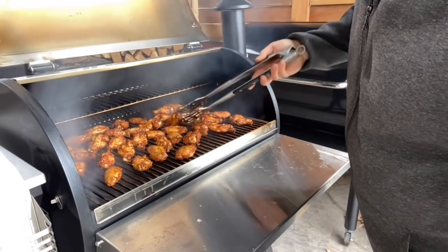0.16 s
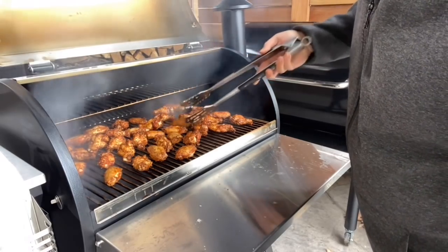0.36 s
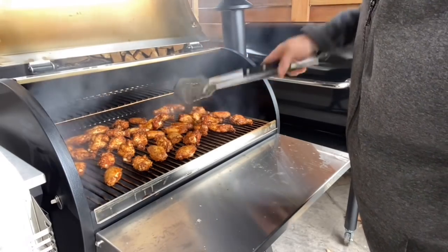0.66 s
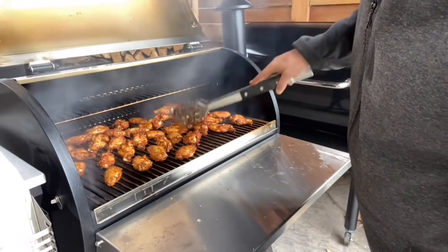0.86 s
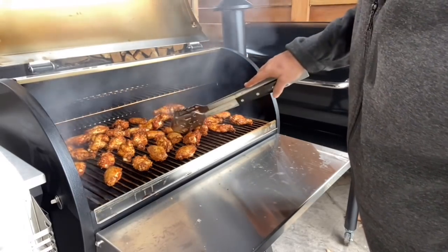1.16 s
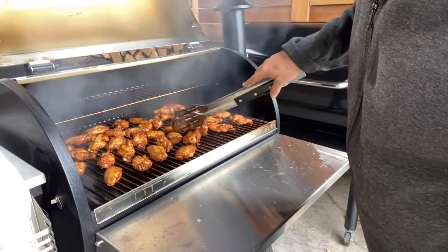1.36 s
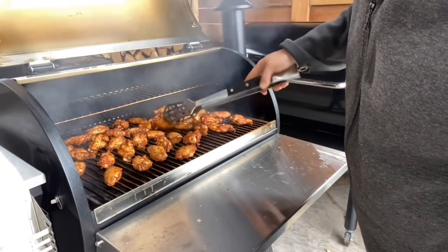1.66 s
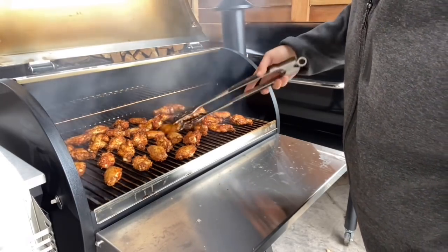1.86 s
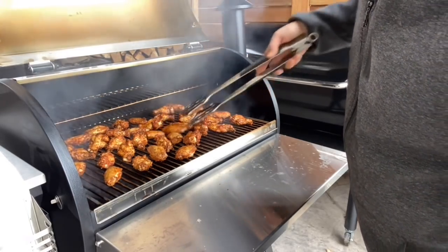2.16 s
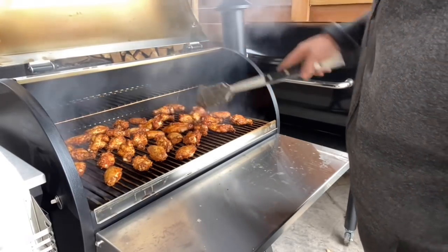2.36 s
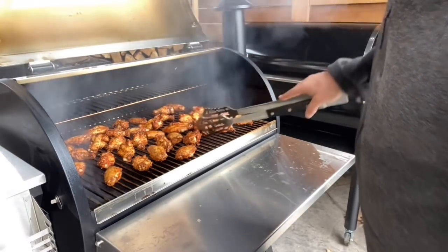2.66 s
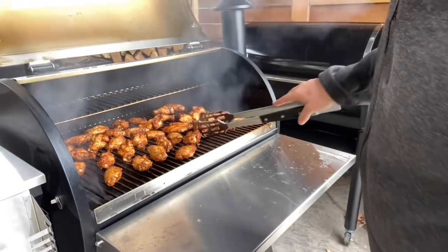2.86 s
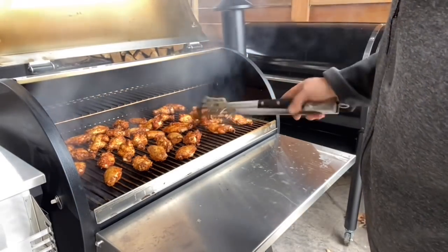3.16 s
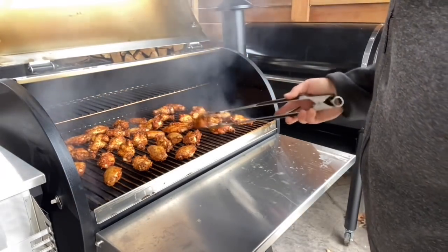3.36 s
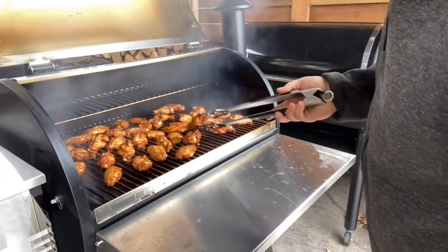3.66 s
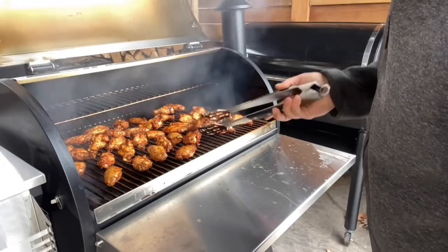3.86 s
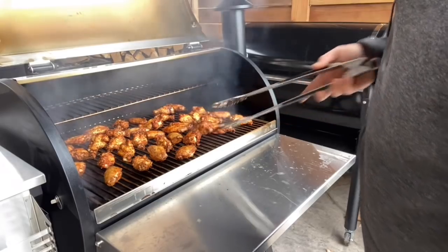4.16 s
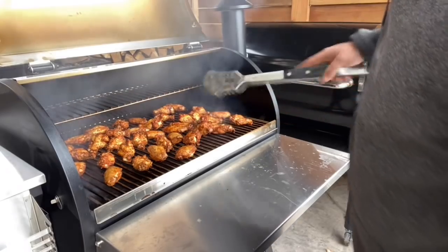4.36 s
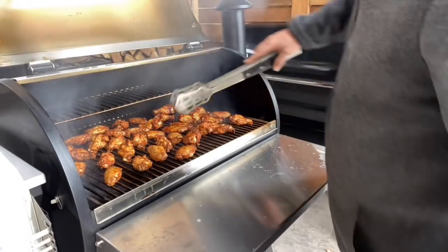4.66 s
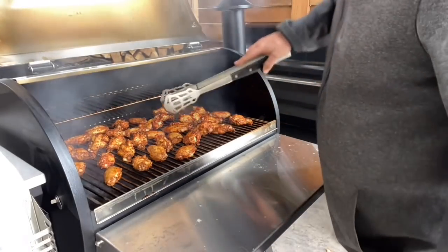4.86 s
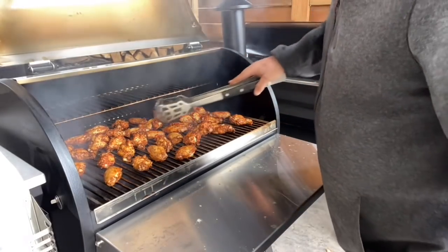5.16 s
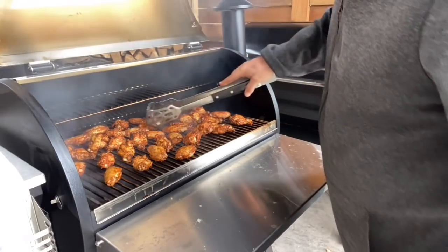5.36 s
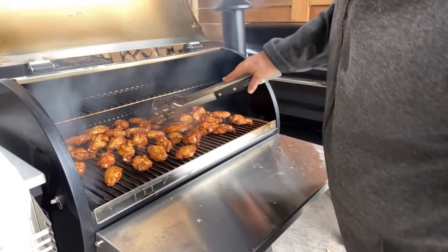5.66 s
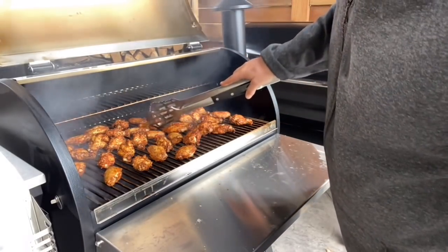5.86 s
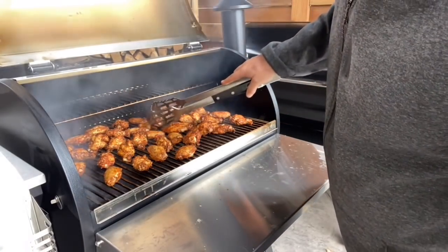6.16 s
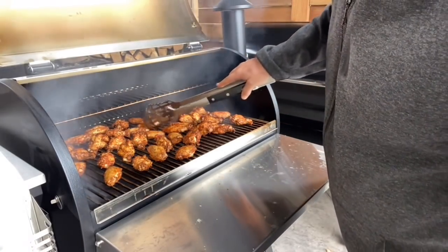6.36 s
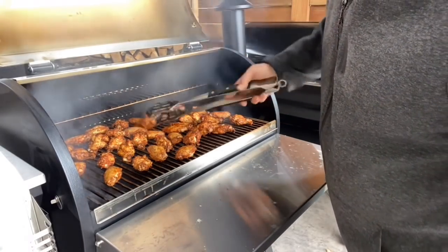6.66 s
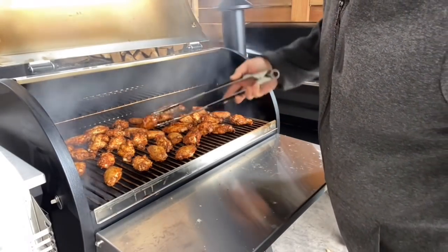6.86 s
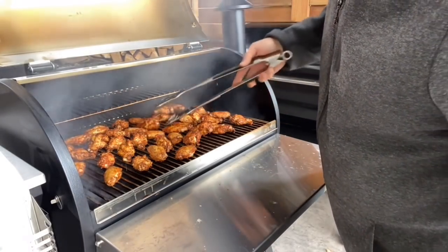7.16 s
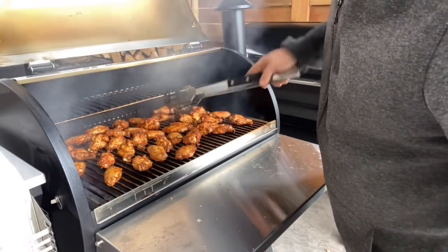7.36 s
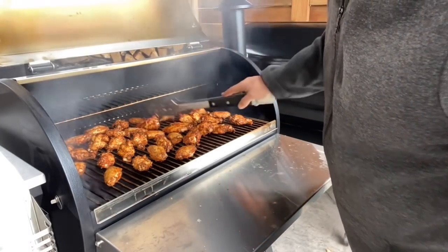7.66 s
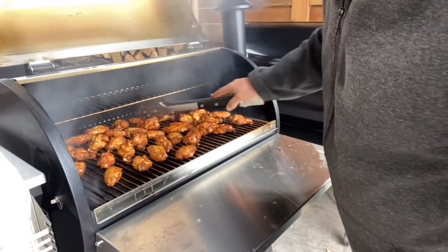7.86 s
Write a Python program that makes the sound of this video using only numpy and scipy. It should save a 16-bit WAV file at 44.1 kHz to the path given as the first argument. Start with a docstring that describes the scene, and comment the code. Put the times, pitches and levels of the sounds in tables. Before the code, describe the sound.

Quiet fluttering sizzle and hollow barrel hum, broken by bursts of tong scraping, crisp clicks, soft bar notes and late rattling grate knocks.

```python
"""Chicken wings sizzle on an open barrel grill outdoors; draught noise hums in the barrel's resonances.
From 1.2 s soft bar notes, then tongs drag skin off the bars: dense ringing slips and click-spray snaps to 3.8 s.
From 4.1 s a low barrel note swells and throbs, with a dull thud; soft notes crowd in, drags return at 5.4 s.
At 6.5 s, and hardest at 7.4-7.7 s, knocks rattle the bars, which ring the modes of the grate.
Near sounds lose their bass, a faint rumble follows them, and the microphone cuts the treble."""
import sys
import numpy as np
from scipy import signal
from scipy.fft import rfft, irfft, next_fast_len
from scipy.io import wavfile
from scipy.ndimage import uniform_filter1d

SR = 44100
rng = np.random.default_rng(int(sys.argv[2]) if len(sys.argv) > 2 else 0)


def dump_mix(stems):
    """Bounce the given channels to the path in sys.argv[1] as a 16-bit WAV at rate SR."""
    frames = np.atleast_2d(stems).T  # one column per channel
    limited = np.clip(frames, -1, 1)  # hard clip at full scale
    pcm = np.round(limited * 32767).astype(np.int16)
    wavfile.write(sys.argv[1], SR, pcm)


N = 353505

# pulls of the tongs: [peak_s, build_s, fade_s, rasp_db, scrape_db, hiss_db]
DRAG_PULLS = [(1.4, 0.17, 0.34, -67.5, -62.5, -58.5), (1.6, 0.033, 0.14, -73, -66, -54.5),
              (1.783, 0.04, 0.04, -55, -49, -55), (1.829, 0.0077, 0.18, -54, -51.5, -47.5),
              (1.91, 0.008, 0.1, -49, -49, -50), (1.94, 0.042, 0.099, -49.5, -46.5, -45),
              (1.99, .04, 0.046, -50.5, -45, -54), (2.048, .04, 0.01, -48.5, -45.5, -56),
              (2.085, 0.027, 0.023, -51.5, -42, -50.5), (2.178, 0.26, 0.99, -68.5, -65, -58),
              (2.904, 0.17, 0.013, -64.5, -63, -75), (2.98, 0.042, 0.032, -71, -62, -56),
              (3.062, .08, 0.021, -64, -57.5, -52.5), (3.305, 0.013, 0.045, -67, -52, -46.5),
              (3.339, 0.036, 0.042, -63, -44, -48), (3.397, 0.024, 0.056, -57, -53, -40.5),
              (3.448, 0.016, 0.0098, -64, -43.5, -44), (3.48, 0.024, 0.11, -61.5, -43, -53),
              (3.546, 0.13, 0.039, -62, -44.5, -48.5), (3.6, 0.037, 0.27, -79, -52.5, -59.5),
              (3.703, 0.0042, 0.055, -64, -41, -58), (3.776, .05, 0.23, -72, -57, -64),
              (5.432, 0.11, 0.12, -63, -66, -60.5), (5.66, 0.22, 0.12, -60, -63, -64),
              (5.814, 0.095, 0.042, -52, -44.5, -68), (5.877, 0.0066, 0.064, -51.5, -44.5, -67),
              (5.998, 0.0078, 0.077, -54.5, -52, -59), (6.276, 0.086, 0.023, -60.5, -57, -66)]
# spectrum of the slips: [freq_hz, relative_db_per_hz]
DRAG_SPECTRUM = [(880, -22), (1500, 5), (1770, -15.5), (1990, -11), (2360, -17), (2800, -5), (3380, 1.5),
                 (5340, -1), (7000, 4), (9100, -47), (15400, -120)]
# snaps of skin and tong tips on the bars: [start_s, level_db, centre_hz, t60_s]
SNAP_EVENTS = [(1.3882, -43, 2530, 0.18), (1.39, -34.5, 3830, 0.12), (1.4195, -34, 4020, 0.083),
               (1.5989, -36, 3800, 0.02), (1.6254, -35, 3420, 0.1), (1.7266, -33.5, 4900, 0.066),
               (1.7764, -39.5, 1970, 0.082), (1.769, -34.5, 5140, 0.29), (1.8294, -28, 5550, 0.065),
               (1.8367, -42, 1930, 0.13), (1.8612, -35.5, 1950, 0.11), (1.889, -27.5, 5060, 0.11),
               (1.9072, -29, 6030, 0.22), (1.9185, -41, 2060, 0.12), (1.946, -29, 3400, 0.091),
               (1.951, -36, 6700, 0.12), (2.0105, -35, 3100, 0.08), (1.9828, -31, 2950, 0.15),
               (2.011, -25.5, 5290, 0.15), (2.0813, -31, 3900, 0.07), (2.099, -30, 5600, 0.036),
               (2.1695, -35.5, 4700, 0.12), (2.972, -45, 5200, 0.02), (3.0535, -38, 5750, 0.029),
               (3.2675, -39, 5700, 0.081), (3.2901, -45, 6200, 0.041), (3.301, -38, 3800, 0.06),
               (3.3937, -31, 5430, 0.11), (3.4486, -33.5, 6000, 0.14), (3.335, -36, 3520, 0.095),
               (3.488, -34, 3530, 0.093), (3.519, -36, 3430, 0.2), (3.4693, -31.5, 3900, 0.037),
               (3.6141, -30.5, 3780, 0.087), (3.6498, -36, 3600, 0.1), (3.7023, -30, 5070, 0.14),
               (3.703, -37, 2420, 0.12), (3.7125, -34, 2620, 0.062), (3.7305, -36, 2620, 0.062),
               (3.729, -38, 3450, 0.13), (3.768, -24, 3770, 0.045), (3.7867, -30.5, 5430, 0.057),
               (4.5386, -41, 5100, 0.045), (5.0143, -41.5, 5740, 0.066), (5.1447, -37, 6250, 0.036),
               (5.3105, -40.5, 2700, 0.047), (5.311, -47, 3330, 0.034), (5.4366, -31, 3820, 0.03),
               (5.6367, -31.5, 3550, 0.053), (5.6665, -31, 3470, 0.062), (5.7507, -33, 3700, 0.067),
               (5.7674, -29.5, 3620, 0.062), (5.7675, -37, 2810, 0.47), (5.7952, -36, 3250, 0.15),
               (5.8076, -31.5, 3830, 0.18), (5.8756, -27.5, 4380, 0.09), (5.905, -28.5, 4030, 0.051),
               (5.9475, -33, 4000, 0.074), (5.9994, -31.5, 4160, 0.072), (6.06, -31.5, 3680, 0.1),
               (6.462, -31.5, 1960, 0.11), (6.5044, -28, 2370, 0.03), (6.7796, -41.5, 6000, 0.07),
               (6.845, -39, 3840, 0.065), (7.3199, -37, 6840, 0.022), (7.3866, -20, 3280, 0.055),
               (7.3868, -18, 2050, 0.072), (7.396, -32, 2650, 0.11), (7.4636, -25.5, 2300, 0.18),
               (7.476, -27, 5700, 0.1), (7.8716, -25.5, 3640, 0.023)]
# knocks on the grate, levels before rise and sag: [start_s, rattle_s, deep_db, low_db, middle_db, bright_db]
GRATE_KNOCKS = [(6.454, 0.042, -60.5, -57, -54, -64), (6.48, 0.043, -57, -60, -61, -69),
                (7.385, 0.13, -48, -44.5, -40.5, -42), (7.468, 0.062, -54.5, -46.5, -47.5, -51),
                (7.525, 0.03, -50, -66, -55.5, -72), (7.669, 0.017, -55.5, -56, -77, -94),
                (7.7, 0.018, -58, -51.5, -73, -89)]
# modes of the grate: [freq_hz, width_hz, relative_db]
GRATE_MODES = [(447, 5.1, 3.5), (600, 9.3, -7.5), (805, 5.8, -1.5), (856, 9.3, -5.5), (915, 15, -2.5),
               (1004, 20, -1), (1180, 16, 4), (1234, 8.4, 4), (1441, 19, 8.5), (1567, 3, -4),
               (1756, 16, -13.5), (2075, 24, -9.5), (2300, 21, -7.5), (2340, 12, -6), (2670, 12, -5),
               (2687, 24, 4), (3310, 12, 2.5), (3530, 57, -6), (3600, 20, -5.5), (3810, 25, -5),
               (4100, 32, -1.5), (5350, 31, 3), (5700, 46, 1.5), (5680, 85, 12.5)]
# per level curve, deep to bright: [centre_hz]
CLANG_CENTRES_HZ = [450, 1000, 2700, 5600]
# rise of each level curve, lows slower: [rise_s]
CLANG_RISE_S = [0.035, 0.025, 0.007, 0.012]
# sag of each level curve, highs die first: [sag_db_per_s]
CLANG_SAG = [50, 67, 150, 348]
# soft touches on the bars, loudest 4 ms after touch_s: [touch_s, peak_db, pitch_hz]
BAR_NUDGES = [(1.193, -51.5, 1228), (1.424, -41, 1240), (1.536, -47, 1233), (1.729, -41.5, 1263),
              (1.858, -48, 1233), (1.918, -50, 1443), (1.949, -47.5, 1254), (2.022, -44, 1480),
              (2.119, -54, 1234), (2.172, -47, 1230), (2.347, -51, 1250), (2.82, -50.5, 1230),
              (3.714, -52.5, 776), (3.745, -50, 784), (3.751, -48, 1222), (4.106, -44.5, 1264),
              (4.53, -49.5, 915), (4.535, -54, 752), (4.807, -45.5, 620), (4.831, -46.5, 896),
              (4.85, -54, 620), (4.914, -44, 915), (4.926, -53, 775), (4.98, -56, 895), (5.11, -41, 900),
              (5.156, -53, 740), (5.175, -49.5, 915), (5.25, -57, 735), (5.288, -58, 910),
              (5.372, -50.5, 906), (5.424, -40, 768), (5.47, -52.5, 914), (5.518, -44, 771),
              (5.608, -48, 900), (5.721, -42.5, 1285), (5.799, -39, 1240), (5.827, -48, 1244),
              (5.87, -44, 1237), (5.899, -40, 1243), (5.971, -43, 1274), (5.996, -41.5, 1250),
              (6.06, -43, 1248), (6.134, -53, 1250), (6.252, -40.5, 1260), (6.282, -55, 1213),
              (6.31, -46, 890), (6.446, -40.5, 1248), (6.474, -43, 1250), (6.497, -43, 1356),
              (6.486, -51, 787), (6.506, -44, 600), (6.515, -44, 763), (6.544, -46, 1247),
              (6.909, -52, 1210), (7.176, -52.5, 1250), (7.27, -51, 759), (7.311, -44.5, 1246),
              (7.404, -31, 805), (7.426, -33, 930), (7.447, -30.5, 805), (7.479, -30.5, 805),
              (7.492, -34, 449), (7.508, -37, 447), (7.545, -39, 462), (7.557, -43, 554),
              (7.553, -40, 1530), (7.61, -46.5, 1520), (7.632, -53, 1465), (7.712, -35, 1292),
              (7.787, -44.5, 910), (7.823, -50, 1244), (8.005, -37, 1286)]
# sizzle and barrel levels: [time_s, sizzle_body_db, sizzle_top_db, lower_hum_db, upper_hum_db]
BED_LEVELS = [(0.0, -61, -62, -64, -68), (1.16, -66.5, -68.5, -64.5, -64.5), (1.76, -62, -61.5, -61.5, -62),
              (1.96, -57, -51, -64.5, -66), (2.14, -58, -67.5, -64, -65.5), (2.52, -64, -63.5, -67, -71.5),
              (2.86, -62.5, -63.5, -65, -63.5), (3.3, -60.5, -62, -69, -66), (3.53, -62.5, -64, -65, -62.5),
              (3.84, -60.5, -61, -64, -65.5), (4.24, -61.5, -63.5, -66, -68), (5.34, -64, -65, -59, -65),
              (5.87, -57, -58, -61.5, -62), (6.54, -60.5, -63, -64, -63.5), (6.85, -62, -64, -63.5, -65),
              (7.37, -60.5, -63.5, -61.5, -64), (7.57, -63, -71, -59, -54.5),
              (8.02, -62.5, -66.5, -62.5, -61.5)]
# spectrum of the sizzle: [freq_hz, relative_db_per_hz]
SIZZLE_SPECTRUM = [(120, -63), (260, -43.5), (335, -25), (420, -30.5), (600, -18.5), (1000, -15),
                   (1500, -21), (2300, -20), (2900, -16.5), (3700, -11), (4600, -11.5), (6300, -3.5),
                   (7500, -10.5), (9800, -57.5)]
# resonances of the barrel: [freq_hz, width_hz, relative_db]
BARREL_MODES = [(462.3, 13, -14), (596.8, 49, -6.5), (742, 37, -5), (921.4, 47, -4), (1248, 34, -1),
                (1413, 100, -8), (1570, 280, -20)]
# swell of the lowest barrel note: [time_s, level_db]
LOW_NOTE_LEVELS = [(4.15, -97), (4.33, -69), (4.8, -67.5), (5.2, -71), (5.42, -76), (5.66, -69), (5.8, -89),
                   (6.0, -83)]
# brief throbs of that note: [centre_s, rise_db]
THROBS = [(4.391, 15), (4.856, 9), (5.152, 8), (5.406, 13.5), (5.872, 15)]

DRAG_SLOPE_DB = 20   # per build_s or fade_s away from the rounded peak
DRAG_ROUND = 0.14   # share of build_s and fade_s over which the peak is rounded
DRAG_SPLITS_HZ = 3150, 4500   # rasp | scrape | hiss
SNAP_RISE_SHARE = 0.018   # of the t60: long sprays start softer
FAINT_SNAPS_PER_S, FAINT_SNAP_DB = 8, -57.5   # lowest level
CLANG_STOP_DB_PER_S = 526   # added once the bars settle
CLATTER_DB = 4.5   # broad clatter between the modes
NUDGE_RISE_S, NUDGE_FALL_S = 0.0057, 0.0071
FAINT_NUDGES_PER_S, FAINT_NUDGE_DB = 3.9, -61.5   # lowest level
SIZZLE_SPLIT_HZ = 4800   # body | top
UPPER_FROM_HZ = 1100   # lower | upper barrel
LOW_NOTE_HZ, LOW_NOTE_WIDTHS_HZ = 339, (36, 47)   # two resonances in series
THROB_S = 0.014
THUD_S, THUD_DB, THUD_HZ, THUD_WIDTH_S = 4.355, -68, 173, 0.0052
RUMBLE_DB, RUMBLE_FOLLOW_DB = -93, -37
NEAR_BASS_EDGE_HZ = 389   # 40 dB down
CEILING = 0.16   # amplitude that rounded peaks approach
SLOPE_HZ, CUTOFF_HZ = 7200, 7720
FLOOR_DB = -102


def drags():
    """Dense uneven slips of steel and skin on the bars; each slip rings briefly at a pitch of its own."""
    clicks = grains(12000 * amp(1.0 * drift(64)), spread_db=4.5)
    pitch_index = rng.integers(0, 24, N)
    rings = np.zeros(N)
    for k, hz in enumerate(np.linspace(1900, 7300, num=24)):
        ring = resonance(clicks * (pitch_index == k) + 1e-18, hz, width_hz=230)
        rings += unit(ring) * amp(1.8 * drift(25))
    slips = coloured(unit(rings) + 0.45 * rng.standard_normal(N), DRAG_SPECTRUM)
    above_rasp = highpass(slips, 8, DRAG_SPLITS_HZ[0])
    hiss = highpass(slips, 2, DRAG_SPLITS_HZ[1])
    parts = slips - above_rasp, above_rasp - hiss, hiss
    return sum(np.sqrt(p) * unit(part) for p, part in zip(drag_power(), parts))


def drag_power():
    """Power of rasp, scrape and hiss: each pull builds up and fades exponentially; overlapping pulls add."""
    t, power = np.arange(N) / SR, np.zeros((3, N))
    for peak_s, build_s, fade_s, *levels_db in DRAG_PULLS:
        near = slice(max(int((peak_s - 2 * build_s) * SR), 0), int((peak_s + 2 * fade_s) * SR))
        before = (peak_s - t[near]) / max(build_s, .003)
        after = (t[near] - peak_s) / max(fade_s, .003)
        drop_db = DRAG_SLOPE_DB * (np.hypot(np.maximum(before, after), DRAG_ROUND) - DRAG_ROUND)
        power[:, near] += amp(np.add.outer(levels_db, -drop_db)) ** 2
    return power


def snaps():
    """Each snap is a crack and a dying spray of uneven clicks around its own centre."""
    out, t = np.zeros(N + SR), np.arange(int(.08 * SR)) / SR
    faint = scattered(FAINT_SNAPS_PER_S, FAINT_SNAP_DB, 3500, 6500)
    rows = SNAP_EVENTS + [row + (.05,) for row in faint]
    for start_s, level_db, hz, t60_s in rows:
        noise, size = rng.standard_normal((2, len(t)))
        clicks = noise * amp(1.6 * size)
        spray = resonance(resonance(clicks, hz, 0.08 * hz), hz, 0.6 * hz)
        t60_s = max(t60_s, .01)
        rise = np.minimum(t / (SNAP_RISE_SHARE * t60_s), 1)
        decay = amp(level_db - 60 * t / t60_s)
        out[round(start_s * SR):][:len(t)] += decay * rise * spray / np.abs(spray).max()
    return out[:N]


def clangs():
    """Loose bars rattle on after a knock and keep exciting the modes of the grate; highs die first."""
    rattle = grains(4000, spread_db=3.5) * amp(2.4 * drift(73)) + 0.89 * rng.standard_normal(N)
    rattles = rattle, np.roll(rattle, N // 2)   # neighbouring modes are shaken by different bars
    levels_db = shaking()
    clatter = [(hz, hz / 4, CLATTER_DB) for hz in np.geomspace(520, 5800, num=15)]
    out = np.zeros(N)
    for k, (hz, width_hz, relative_db) in enumerate(GRATE_MODES + clatter):
        # blend of the two nearest level curves
        share = [np.interp(np.log(hz), np.log(CLANG_CENTRES_HZ), row) for row in np.eye(4)]
        rung = resonance(resonance(rattles[k % 2], hz, width_hz), hz, 1.3 * hz)
        gain = amp(relative_db + share @ levels_db + 2.3 * drift(45))
        out += (-1) ** (k // 2) * gain * unit(rung)
    return out


def shaking():
    """Deep, low, middle and bright level in dB: each knock rises, sags while the bars rattle, then stops."""
    levels_db, t = np.full((4, N), -130.), np.arange(SR // 4) / SR
    rise_db = 20 * np.log10(np.clip(np.outer(1 / np.array(CLANG_RISE_S), t), 1e-3, 1))
    for start_s, rattle_s, *knock_db in GRATE_KNOCKS:
        fall_db = np.outer(CLANG_SAG, t) + CLANG_STOP_DB_PER_S * np.maximum(t - rattle_s, 0)
        start = round(start_s * SR)
        here = slice(start, start + len(t))
        levels_db[:, here] = np.maximum(levels_db[:, here], np.array(knock_db)[:, None] + rise_db - fall_db)
    return levels_db


def nudges():
    """A damped touch gives a short note that swells and fades; low notes stir the nearby barrel resonances."""
    out, t = np.zeros(N + SR), np.arange(int(.045 * SR)) / SR
    shape = np.exp(-((t - .015) / np.where(t < .015, NUDGE_RISE_S, NUDGE_FALL_S)) ** 2)
    barrel_hz = np.array(BARREL_MODES)[:, 0]
    faint = scattered(FAINT_NUDGES_PER_S, FAINT_NUDGE_DB, 550, 1400)
    # faint touches sound the nearest barrel resonance
    faint = [(s, db, barrel_hz[np.abs(barrel_hz - hz).argmin()]) for s, db, hz in faint]
    for touch_s, peak_db, hz in BAR_NUDGES + faint:
        octaves = np.abs(np.log2(barrel_hz / hz))
        stirred = (octaves > .1) & (np.maximum(barrel_hz, hz) < UPPER_FROM_HZ)
        share = stirred * amp(1.0 - 22.0 * octaves) * rng.random(len(barrel_hz))
        phases = rng.random((len(barrel_hz), 1))   # in turns
        note = np.sin(2 * np.pi * (hz * t + rng.random()))
        note += share @ np.sin(2 * np.pi * (np.outer(barrel_hz, t) + phases))
        out[max(round((touch_s - .011) * SR), 0):][:len(t)] += amp(peak_db) * shape * note
    return out[:N]


def sizzle(body_db, top_db):
    """Thousands of fat bubbles a second, merging into a hiss that flutters."""
    fat = coloured(grains(9000, spread_db=4.0) + 1.3 * rng.standard_normal(N), SIZZLE_SPECTRUM)
    top = highpass(fat, 2, SIZZLE_SPLIT_HZ)
    body = amp(body_db + 1.0 * drift(4.8)) * unit(fat - top)
    top = amp(top_db + 0.75 * drift(3.9)) * unit(top)
    return amp(1.22 * drift(39)) * (body + top)


def barrel_hum(lower_db, upper_db):
    """Draught noise rings the barrel; each resonance swells on its own."""
    rings = np.array([amp(db + 2.67 * drift(7.0)) * resonance(rng.standard_normal(N), hz, width_hz)
                      for hz, width_hz, db in BARREL_MODES])
    upper = np.array(BARREL_MODES)[:, 0] > UPPER_FROM_HZ
    lower_hum = amp(lower_db) * unit(rings[~upper].sum(axis=0))
    return lower_hum + amp(upper_db) * unit(rings[upper].sum(axis=0))


def low_note():
    """Noise through two narrow resonances: the barrel's lowest note, throbbing; one dull thud as it sets in."""
    air = rng.standard_normal(N)
    for width_hz in LOW_NOTE_WIDTHS_HZ:
        air = resonance(air, LOW_NOTE_HZ, width_hz)
    t = np.arange(N) / SR
    throb_db = sum(db * np.exp(-((t - s) / THROB_S) ** 2) for s, db in THROBS)
    level_db = curves(LOW_NOTE_LEVELS, outside=-120)[0]
    note = amp(level_db + throb_db + 1.8 * drift(14)) * unit(air)
    thud = np.exp(-((t - THUD_S) / THUD_WIDTH_S) ** 2) * np.sin(2 * np.pi * THUD_HZ * t)
    return note + amp(THUD_DB) * thud


def rumble(near):
    """Low noise: a constant part plus a part that follows the strength of the near sounds."""
    strength = np.sqrt(uniform_filter1d(resonance(near, 1200, 2100) ** 2, size=600) + 1e-12)
    return (amp(RUMBLE_DB) + amp(RUMBLE_FOLLOW_DB) * strength) * band(rng.standard_normal(N), 11, 450)


def scattered(per_s, lowest_db, low_hz, high_hz):
    """Rows [time_s, level_db, pitch_hz] of faint events at random moments, over a 6 dB range."""
    when, size, pitch = rng.random((int(per_s * N / SR), 3)).T
    return list(zip(when * N / SR, lowest_db + 6 * size, low_hz * (high_hz / low_hz) ** pitch))


def grains(per_s, spread_db):
    """Random clicks of uneven size and either sign; rms 1."""
    sizes = amp(spread_db * np.minimum(rng.exponential(1, N), 5)) * rng.choice([-1, 1], N)
    return unit(sizes * (rng.random(N) < per_s / SR))


def drift(rate_hz):
    """Slow random curve of rms 1: noise through two equal low-pass poles, computed every 40 samples."""
    r = np.exp(-80 * np.pi * rate_hz / SR)
    slow = signal.lfilter([1], [1, -2 * r, r * r], rng.standard_normal(N // 40 + 2002))[2000:]
    return np.interp(np.arange(N) / 40, np.arange(len(slow)), unit(slow))


def resonance(x, hz, width_hz):
    """Two-pole resonance, gain about 1 on top."""
    r = np.exp(-np.pi * width_hz / SR)
    poles = [1, -2 * r * np.cos(2 * np.pi * hz / SR), r * r]
    return signal.lfilter([(1 - r * r) / 2, 0, (r * r - 1) / 2], poles, x)


def coloured(x, spectrum):
    """Filter by a spectrum table, interpolated over log frequency; rms 1."""
    size = next_fast_len(N)
    hz, db = np.transpose(spectrum)
    gain = amp(np.interp(np.log(np.fft.rfftfreq(size, 1 / SR) + 1), np.log(hz), db))
    return unit(irfft(rfft(x, size) * gain, size)[:N])


def highpass(x, order, hz):
    """Zero-phase high-pass, so that x minus the result is the rest."""
    return signal.sosfiltfilt(signal.butter(order, hz, "high", fs=SR, output="sos"), x)


def band(x, low_hz, high_hz):
    """Band-pass; rms 1."""
    return unit(signal.sosfilt(signal.butter(2, [low_hz, high_hz], "band", fs=SR, output="sos"), x))


def curves(rows, outside=None):
    """Columns of a table as curves in time."""
    s, *columns = np.transpose(rows)
    return [np.interp(np.arange(N) / SR, s, c, outside, outside) for c in columns]


def amp(db):
    """Gain of a level in dB."""
    return 10 ** (np.asarray(db) / 20)


def unit(x):
    """Scale to rms 1."""
    return x / np.sqrt(np.mean(x ** 2) + 1e-20)


def scene():
    """Near sounds and hum with their bass cut, plus sizzle, low note and rumble."""
    body_db, top_db, lower_db, upper_db = curves(BED_LEVELS)
    near = drags() + snaps() + clangs() + nudges() + barrel_hum(lower_db, upper_db)
    bass_cut = signal.cheby2(12, 40, NEAR_BASS_EDGE_HZ, "high", fs=SR, output="sos")
    return (signal.sosfilt(bass_cut, near) + sizzle(body_db, top_db) + low_note() + rumble(near))[None]


def record(dry):
    """Peaks are rounded; the treble slopes off, then is cut steeply, over a faint noise floor."""
    rounded = CEILING * np.tanh(dry / CEILING)
    sloped = signal.sosfilt(signal.butter(20, SLOPE_HZ, fs=SR, output="sos"), rounded)
    cut = signal.sosfilt(signal.ellip(12, .5, 60, CUTOFF_HZ, fs=SR, output="sos"), sloped)
    return cut + amp(FLOOR_DB) * rng.standard_normal(dry.shape)


dry = scene()
out = record(dry)
dump_mix(out)
```